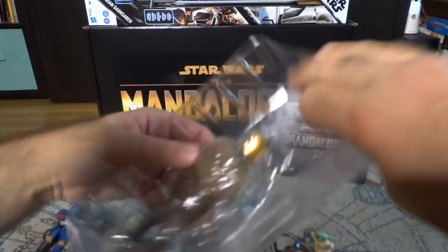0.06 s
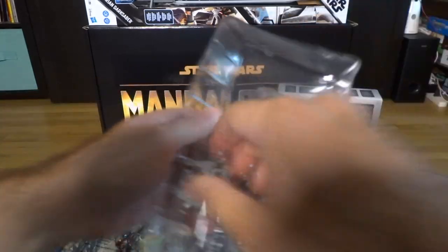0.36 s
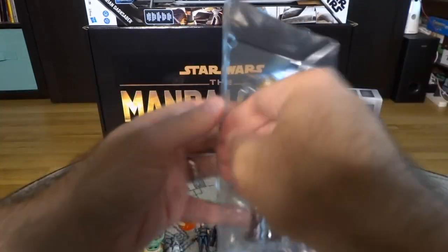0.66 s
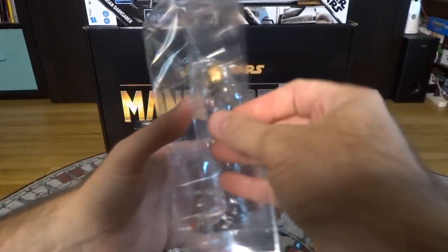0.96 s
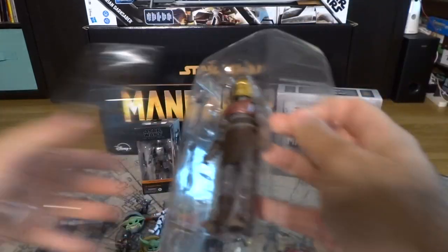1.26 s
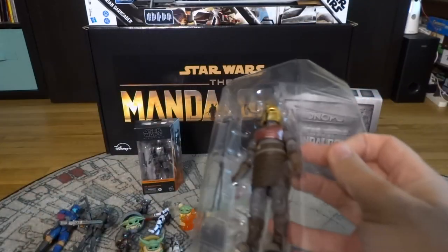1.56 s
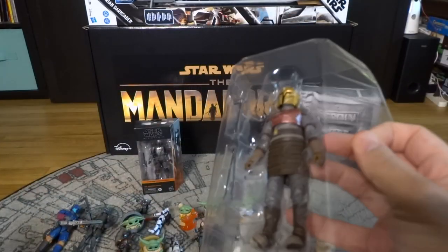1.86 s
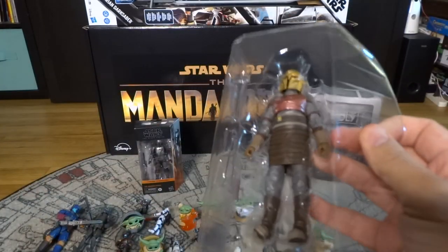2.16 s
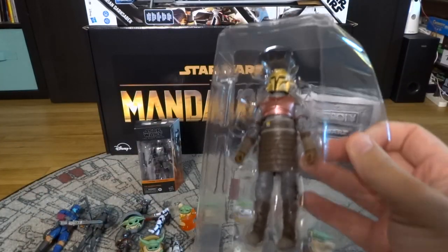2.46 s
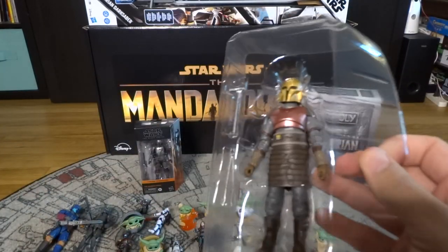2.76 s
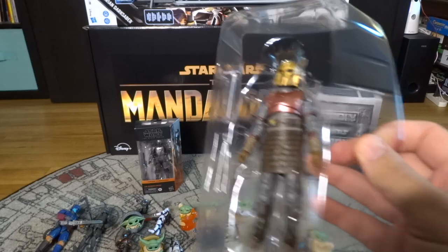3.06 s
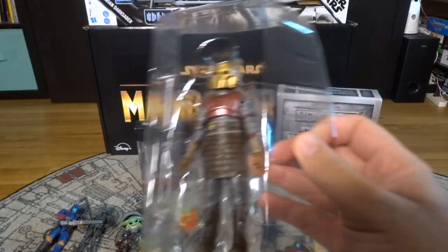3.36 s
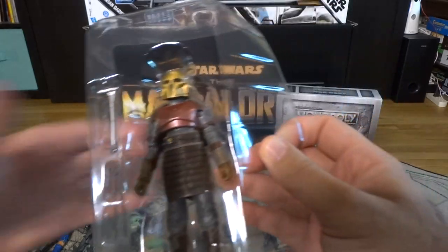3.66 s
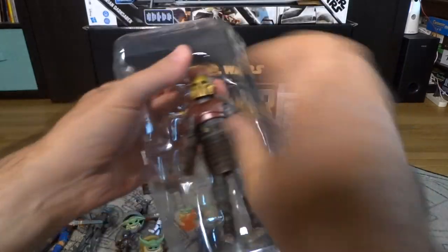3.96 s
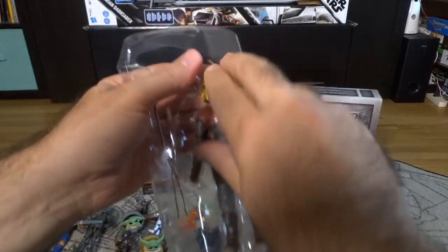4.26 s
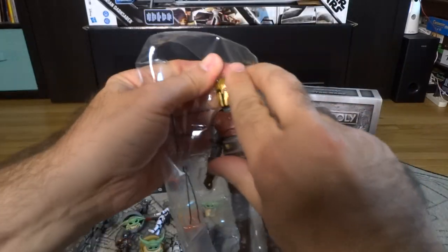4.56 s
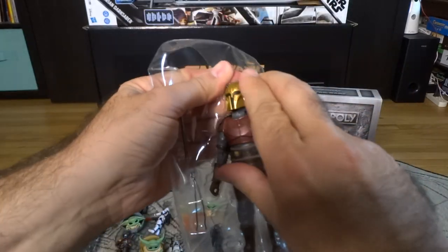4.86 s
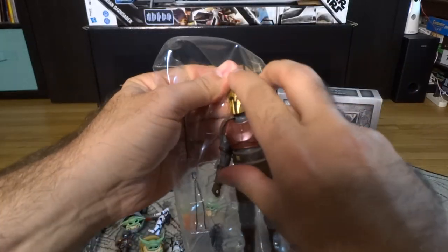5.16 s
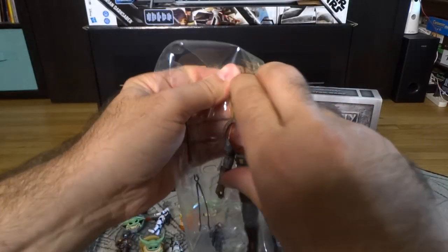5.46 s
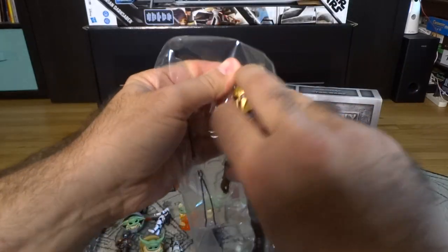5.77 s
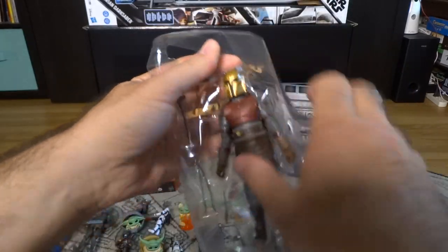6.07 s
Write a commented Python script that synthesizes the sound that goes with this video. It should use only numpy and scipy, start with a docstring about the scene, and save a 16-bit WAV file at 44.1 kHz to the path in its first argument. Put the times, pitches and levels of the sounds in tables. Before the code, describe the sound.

A thin plastic tray holding a toy figure is handled close to the microphone in a quiet living room with slight reverberation. From the start to about 1.5 seconds it crinkles and rubs in short uneven bursts, with bright ticks and hollow pops. A fuller flex with fingertips sliding over the plastic comes at about 1.8 to 2.3 seconds. The handling then drops to faint rustling and a few small ticks. At about 3.8 seconds a strong push starts a dense run of sharp crackles, snapping creases and hollow knocks. Around 4.5 seconds the figure drags against the plastic with a rasp and one very brief high squeal. The crackling eases near 5 seconds, then picks up again from 5.2 seconds, with more pops, finger rubs and clusters of snaps continuing until just past 6 seconds.

```python
"""Unboxing a toy figure

Hands work a figure and its thin plastic tray out of a box, close to the microphone in a living room.
Each push makes the tray flex, rub and crinkle in dense small slips that swell, hold and die away;
between pushes it rustles faintly in the grip. Creases snap with bright ticks, panels pop with hollow
knocks and fingertips slide over them. Once the figure squeals against the plastic that holds it."""
import sys
import numpy as np
from scipy import signal
from scipy.fft import rfft, irfft, next_fast_len
from scipy.io import wavfile
from scipy.ndimage import uniform_filter1d

SR = 44100
rng = np.random.default_rng(int(sys.argv[2]) if len(sys.argv) > 2 else 0)


def wav_out(sig):
    """Save sig, one row per channel (or a flat mono array), as 16-bit PCM at SR to the path in sys.argv[1]."""
    wavfile.write(sys.argv[1], SR, np.round(np.clip(np.atleast_2d(sig).T, -1, 1) * 32767).astype(np.int16))


N = 274743
TIME = np.arange(N) / SR

# pushes of the hands: (start [s], rise [s], length [s], flex [dB], rub [dB], crinkle [dB])
HAND_PUSHES = [(0.0, .025, 0.033, -40.5, -36, -43.5), (0.043, 0.0057, .008, -33.5, -34, -54),
               (0.169, 0.015, 0.011, -29.5, -28.5, -30), (0.434, 0.0022, 0.0072, -44, -29.5, -33.5),
               (0.478, 0.019, 0.032, -42.5, -35, -33.5), (0.604, 0.0055, 0.0099, -53, -51, -41),
               (0.708, 0.007, 0.12, -74, -63, -44.5), (0.822, .075, 0.2, -41.5, -34.5, -35),
               (1.098, 0.008, 0.059, -38.5, -44.5, -39.5), (1.216, 0.03, 0.025, -36.5, -39, -41.5),
               (1.406, 0.0043, 0.0053, -41.5, -55, -42.5), (1.447, .004, 0.0067, -43.5, -46, -73),
               (1.712, .025, .07, -50, -68, -79), (1.832, 0.039, 0.15, -27.5, -27.5, -32),
               (2.118, .003, 0.055, -34.5, -29, -32.5), (2.198, 0.025, 0.031, -32.5, -27, -33.5),
               (2.285, 0.0083, 0.019, -36, -38, -70), (2.616, 0.012, 0.019, -56, -60, -52.5),
               (2.735, 0.025, 0.22, -64, -65, -50), (2.913, 0.02, 0.054, -58.5, -46, -37),
               (3.104, 0.0034, 0.0072, -51, -51, -51.5), (3.332, .006, 0.068, -57.5, -51.5, -47.5),
               (3.743, 0.0044, 0.032, -53.5, -39, -52), (3.82, 0.016, 0.076, -41, -35, -34),
               (3.868, 0.038, 0.052, -27.5, -24.5, -35), (3.991, .01, .03, -47.5, -45.5, -43),
               (4.041, 0.0036, 0.047, -39.5, -27, -30.5), (4.264, 0.024, 0.12, -53.5, -36, -31.5),
               (4.457, 0.015, 0.077, -58, -31.5, -23.5), (4.658, 0.014, 0.0067, -39.5, -31.5, -30),
               (4.742, 0.0039, 0.089, -50.5, -38, -46), (4.964, 0.017, 0.014, -50.5, -39, -38.5),
               (5.062, 0.0091, 0.017, -51.5, -44, -46.5), (5.108, 0.0033, 0.012, -59, -41.5, -39),
               (5.227, 0.0084, .09, -52.5, -36.5, -32), (5.326, .01, 0.075, -50.5, -35.5, -38.5),
               (5.48, 0.0098, 0.054, -46.5, -45.5, -71), (5.59, 0.021, 0.066, -49.5, -42.5, -40),
               (5.734, .012, 0.072, -38.5, -37.5, -34), (5.833, 0.016, 0.036, -40, -35.5, -32),
               (5.998, 0.0033, 0.072, -55.5, -39.5, -41), (6.145, 0.0046, 0.051, -46.5, -40.5, -38)]
# faint rustle of the tray in the grip: (time [s], level [dB])
GRIP_RUSTLE = [(0.0, -40), (0.32, -40.5), (0.42, -53.5), (0.6, -51.5), (1.15, -43.5), (1.37, -69),
               (1.66, -65.5), (1.81, -82), (2.0, -41.5), (2.3, -50.5), (2.7, -63), (3.05, -65), (3.31, -70),
               (3.5, -60.5), (3.73, -60.5), (4.05, -46), (4.5, -34.5), (4.9, -44.5), (5.19, -53),
               (5.75, -36), (6.13, -57)]
# tone of the low flex, the mid rub and the bright crinkle: (frequency [Hz], relative level [dB])
FLEX_TONE = [(30, -51), (70, -8), (130, -9), (220, -3), (330, -1), (560, -2), (700, -4), (1000, -22.5)]
RUB_TONE = [(400, -19), (600, -5.5), (800, 2), (1300, 3), (2000, 1), (2900, -7.5), (3600, -10.5),
            (5000, -13)]
CRINKLE_TONE = [(1800, -48), (2800, 1.5), (3500, 0.5), (5000, -1.5), (6500, 2), (8200, 3.5), (9600, -2),
                (11200, -11.5)]
# creases snapping: (time [s], attack level [dB], pitch [Hz])
CREASE_SNAPS = [(0.0284, -31, 7400), (0.1867, -20, 8060), (0.4367, -28, 5800), (0.44, -21, 7250),
                (0.4943, -25, 8250), (0.5155, -21.5, 6120), (0.7001, -24, 4580), (0.7105, -31.5, 5400),
                (0.9462, -29.5, 6600), (0.991, -29, 3020), (1.4095, -23.5, 8200), (1.4108, -23.5, 8000),
                (1.42, -29, 8300), (2.127, -27.5, 6440), (2.1745, -30.5, 4570), (2.223, -24, 5240),
                (2.7695, -37, 6200), (2.9296, -31, 3700), (3.1095, -41.5, 6560), (3.8797, -22, 4250),
                (3.9005, -21.5, 7600), (3.9184, -24, 3400), (3.9492, -27.5, 5560), (3.997, -27, 7550),
                (4.0026, -20.5, 8500), (4.0177, -19, 8900), (4.0424, -20, 8700), (4.0676, -21.5, 8600),
                (4.1233, -22.5, 9300), (4.1326, -21, 8850), (4.1382, -21.5, 7900), (4.156, -19, 6900),
                (4.1683, -21.5, 7500), (4.1722, -25, 6400), (4.2157, -22, 9100), (4.2334, -20.5, 6900),
                (4.2375, -19.5, 9150), (4.275, -18.5, 9600), (4.2781, -22, 8700), (4.3078, -28, 7100),
                (4.3174, -15.5, 5800), (4.3378, -19, 8350), (4.3447, -22, 8700), (4.352, -19, 9200),
                (4.389, -23.5, 9650), (4.451, -21, 8300), (4.463, -16, 8300), (4.5036, -15, 5130),
                (4.5378, -18.5, 5600), (4.6428, -17.5, 6340), (4.6706, -19, 6160), (4.6764, -22, 7650),
                (4.7703, -25.5, 9800), (4.807, -29.5, 7500), (4.842, -34, 6140), (4.9605, -31.5, 8500),
                (5.1168, -27, 7400), (5.1807, -27, 8500), (5.2365, -18, 7800), (5.244, -34, 9300),
                (5.27, -16.5, 7500), (5.2909, -19, 9000), (5.6802, -26, 6760), (5.706, -28, 8700),
                (5.7393, -27, 8440), (5.7538, -24, 8200), (5.772, -28, 7400), (5.8613, -20.5, 8600),
                (5.872, -17.5, 7960), (5.9004, -16.5, 8650), (5.9154, -17.5, 7540), (5.9267, -17.5, 9000),
                (5.937, -18.5, 8350), (5.9508, -22, 7700), (6.014, -31.5, 3700), (6.1491, -32, 5060),
                (6.1737, -30, 4060), (6.1795, -26.5, 8340), (6.211, -25, 7250), (6.2213, -22.5, 8100)]
# panels popping, some damped by fingers: (time [s], attack level [dB], pitch [Hz], t60 [s])
PANEL_POPS = [(0.0512, -25.5, 1140, 0.089), (0.1505, -39.5, 1730, 0.025), (0.1882, -20.5, 1390, 0.03),
              (0.4396, -24, 1390, 0.023), (0.6836, -35, 2150, 0.013), (0.9837, -32, 840, 0.058),
              (1.1112, -30.5, 2500, .019), (1.285, -38.5, 744, 0.047), (1.41, -44.5, 760, 0.018),
              (1.8653, -34, 1200, .032), (1.9765, -30.5, 800, .013), (2.1168, -32.5, 1800, 0.02),
              (2.2307, -25, 1890, 0.053), (2.2975, -35.5, 1610, 0.026), (3.8782, -29, 1970, .045),
              (3.9246, -22.5, 970, 0.043), (3.9957, -34, 745, 0.015), (4.0435, -26, 2170, .017),
              (4.1716, -31, 2500, 0.018), (4.2153, -32.5, 1730, 0.013), (4.2424, -27.5, 1550, 0.0044),
              (4.3078, -26, 2120, 0.027), (4.4109, -32.5, 2120, 0.014), (4.4623, -27.5, 2200, 0.011),
              (4.501, -31, 2120, .008), (4.5548, -21.5, 1760, 0.009), (4.6432, -27.5, 1790, 0.043),
              (4.6795, -25, 1750, 0.019), (4.7533, -24, 1570, 0.019), (4.8672, -38.5, 1480, 0.019),
              (4.9125, -38, 1880, 0.053), (5.03, -41, 1480, 0.052), (5.0845, -43, 1600, .014),
              (5.1108, -35, 1900, .029), (5.2278, -24.5, 1680, 0.011), (5.2931, -31.5, 1730, 0.031),
              (5.3255, -27, 1210, 0.01), (5.3706, -35.5, 1470, 0.03), (5.4857, -34, 2200, 0.012),
              (5.5324, -24.5, 1105, .038), (5.5603, -33, 1170, .016), (5.6332, -37, 1880, 0.015),
              (5.6625, -32.5, 1690, 0.0074), (5.6828, -33, 1870, .009), (5.7062, -33, 1530, 0.02),
              (5.7576, -31.5, 1690, .018), (5.8004, -30.5, 1000, .009), (5.8178, -35.5, 1770, .023),
              (5.8468, -21.5, 1110, 0.013), (5.8563, -28, 1030, 0.042), (5.9214, -29, 1670, 0.015),
              (5.9499, -35, 1970, .023), (6.0142, -29, 1760, 0.024), (6.1503, -32, 1530, 0.057),
              (6.1929, -29.5, 1870, 0.0023), (6.212, -33.5, 1690, 0.011)]
# fingers sliding over a panel: (time [s], level [dB], pitch [Hz], t60 [s])
FINGER_STROKES = [(0.051, -31.5, 221, 0.06), (0.185, -30, 187, 0.11), (0.62, -36.5, 870, 0.047),
                  (0.794, -33, 2860, 0.03), (0.94, -31.5, 800, 0.18), (0.983, -34.5, 776, 0.31),
                  (1.104, -28.5, 746, 0.055), (1.13, -33, 865, 0.27), (1.866, -26.5, 1210, 0.78),
                  (1.97, -20.5, 244, 0.068), (2.118, -35, 3570, 0.54), (2.223, -34, 125, 0.12),
                  (2.615, -44, 223, 0.14), (2.625, -49, 2600, 0.27), (2.93, -42, 3500, 0.14),
                  (2.93, -39.5, 673, 0.073), (3.335, -51, 447, 0.22), (3.835, -43, 151, 0.3),
                  (4.043, -29, 2660, 0.4), (4.05, -29.5, 8540, 0.42), (5.225, -23.5, 1680, 0.2),
                  (5.323, -26, 890, 0.069), (5.533, -22.5, 750, 0.055)]
# the figure dragged through its pocket: (time [s], rasp [dB], squeal [dB])
FIGURE_DRAG = [(4.46, -38, -62), (4.498, -23, -50), (4.513, -24, -17.5), (4.548, -23, -28),
               (4.558, -27.5, -50), (4.585, -22.5, -47), (4.635, -31.5, -53), (4.68, -49, -73)]
# resonances of that pocket and of the whole tray: (pitch [Hz], nominal width [Hz], relative level [dB])
POCKET_MODES = [(1730, 340, 7), (2720, 330, 3.5), (3530, 1200, 1.5), (4800, 590, -7)]
TRAY_MODES = [(290, 72, -15), (479, 81, 0.5), (780, 16, -10.5), (903, 86, -3.5), (1054, 23, -13),
              (1440, 20, -29), (1690, 77, -21), (1970, 20, -36), (2770, 230, -16.5), (8300, 1900, -15)]
# decay of the living room: (frequency [Hz], t60 [s])
ROOM_DECAY = [(150, 0.39), (400, 0.71), (1000, 0.21), (2800, 0.43), (7300, 0.28), (12000, 0.32)]
# room tone of still air: (frequency [Hz], relative level [dB])
AIR_TONE = [(15, -2), (45, -6.5), (90, -1.5), (170, -20.5), (450, -21), (1200, -29), (4000, -38.5),
            (11000, -37)]
# lead of the left microphone port over the right: (frequency [Hz], phase [rad])
LEFT_LEAD = [(60, .02), (250, 0.16), (500, 0.26), (800, .5), (1300, 0.43), (2200, 0.27), (5000, .1),
             (11000, 0.3)]
# lift of the left port over the right: (frequency [Hz], gain [dB])
LEFT_LIFT = [(60, 0.5), (350, 1), (700, 1.5), (1150, 2), (2100, 0.9), (4000, 1), (11000, 1)]


def effort(push_levels_db, release_db_per_s, grip_db):
    """Envelope in dB of one kind of slip: each push swells, eases and lets go, over the grip's rustle."""
    sag_db_per_s = 47
    power = from_db(in_time(GRIP_RUSTLE)[0] + grip_db) ** 2
    for (start, rise, length, *_), level_db in zip(HAND_PUSHES, push_levels_db):
        first = int(start * SR)
        t = TIME[:min(SR, N - first)]
        fall_db = sag_db_per_s * t + release_db_per_s * np.maximum(t - length, 0)
        power[first:first + len(t)] += (np.minimum(t / rise, 1) * from_db(level_db - fall_db)) ** 2
    return 10 * np.log10(power)


def rustle(level_db, tone, band_hz, per_s, spread_db, cycles, grain):
    """Separate slips stand out while the hands push; a light touch or a fade blurs them into a wash."""
    slope_db_per_s = np.gradient(uniform_filter1d(level_db, size=900)) * SR
    pressing = np.clip((level_db + 73.5) / 22, .15, 1)
    grain_share = np.clip(grain * pressing * (1 + np.minimum(slope_db_per_s, 0) / 130), .1, .97)
    grains = coloured(patches(slips(per_s, spread_db), band_hz, cycles), tone)
    wash = coloured(rng.standard_normal(N), tone)
    return from_db(level_db) * (np.sqrt(grain_share) * grains + np.sqrt(1 - grain_share) * wash)


def slips(per_s, spread_db):
    """Plastic sticks and slips: clicks of uneven size at random moments, levelled over 25 ms."""
    sizes = from_db(spread_db * np.minimum(rng.exponential(1, N), 4)) * rng.choice([-1, 1], N)
    clicks = sizes * (rng.random(N) < per_s / SR)
    local_power = np.abs(uniform_filter1d(clicks ** 2, size=1100))
    return clicks / np.sqrt(local_power + 1e-6)


def patches(clicks, band_hz, cycles, count=18):
    """Every slip rings one patch of plastic, at that patch's own pitch, for a few cycles."""
    patch = rng.integers(0, count, N)
    pitches = np.geomspace(*band_hz, count)
    return sum(resonance(clicks * (patch == k) + 1e-18, hz, hz / cycles) for k, hz in enumerate(pitches))


def buckles(events, attack_s, width, scatter, crumple_s, settle_db, settle_t60, ring_db, band_hz):
    """Plastic gives way in one jump and a dying flurry that ring the patch around it, then settles."""
    t = TIME[:4096]
    out = np.zeros(N + len(t))
    settling = from_db(settle_db) * decay(t, settle_t60)
    for (s, level_db, hz, t60), flurry in zip(events, rng.standard_normal((len(events), len(t)))):
        force = scatter * np.sqrt(hz / SR) * flurry * (decay(t, t60) + settling)
        force[0] = 1 / (1 + t60 / crumple_s)   # a long crumple starts with a smaller jump
        crack = resonance(force, hz, width * hz)
        ring = resonance(crack, hz, np.log(1000) / (np.pi * t60))
        hit = band_pass(crack + from_db(ring_db) * ring, band_hz)
        start = int(s * SR)
        out[start:start + len(t)] += from_db(level_db) * hit / hit[:int(attack_s * SR)].std()
    return out[:N]


def crease_snaps(ring_cycles):
    """Creases snap over with short bright ticks; the higher the pitch, the shorter the ring."""
    creases = [(s, level_db, hz, ring_cycles / hz) for s, level_db, hz in CREASE_SNAPS]
    return buckles(creases, attack_s=.002, width=.38, scatter=1.4, crumple_s=.004,
                   settle_db=-19.5, settle_t60=.042, ring_db=-3.5, band_hz=(3400, 10950))


def panel_pops():
    """Panels pop through with hollow knocks."""
    return buckles(PANEL_POPS, attack_s=.007, width=.81, scatter=.55, crumple_s=.093,
                   settle_db=-26.5, settle_t60=.06, ring_db=-5.5, band_hz=(428, 3350))


def finger_strokes(rise_s, width, per_s):
    """A fingertip catches, then slides to rest in fine slips that ring the panel under it."""
    out, force = np.zeros(N), slips(per_s, spread_db=3)
    for s, level_db, hz, t60 in FINGER_STROKES:
        span = slice(int(s * SR), int((s + t60) * SR))
        t = TIME[span] - TIME[span][0]
        panel = rms_one(double_resonance(force[span], hz, width * hz))
        out[span] += from_db(level_db) * panel * (1 - np.exp(-t / rise_s)) * decay(t, t60)
    return out


def figure_drag(squeal_hz, squeal_width_hz):
    """Quick stick and slip rasps in the pocket that holds the figure and briefly locks into a squeal."""
    rasp_db, squeal_db = in_time(FIGURE_DRAG)
    force = patches(slips(per_s=2200, spread_db=.5), band_hz=(1280, 6000), cycles=4.7)
    rasp = sum(from_db(db) * double_resonance(force, hz, 2 * width) for hz, width, db in POCKET_MODES)
    squeal = double_resonance(slips(per_s=2500, spread_db=0), squeal_hz, squeal_width_hz)
    dragging = (TIME > FIGURE_DRAG[0][0]) * (TIME < FIGURE_DRAG[-1][0])
    return (from_db(rasp_db) * rms_one(rasp) + from_db(squeal_db) * rms_one(squeal)) * dragging


def tray(x, ring_db):
    """Whatever happens to the plastic also rings the whole shell."""
    shell = sum(from_db(db + ring_db) * resonance(x + 1e-18, hz, width) for hz, width, db in TRAY_MODES)
    return x + shell


def room(x, predelay_s):
    """The living room answers with a diffuse tail that dies band by band."""
    t = TIME[:SR * 6 // 10]
    edges, tail = np.geomspace(100, 13000, 8), 0
    for low, high in zip(edges, edges[1:]):
        band = band_pass(rng.standard_normal(len(t)), (low, high))
        tail = tail + band * decay(t, at_hz(ROOM_DECAY, np.sqrt(low * high)))
    tail = tail * (t > predelay_s)
    return signal.fftconvolve(x, tail / np.sqrt(np.sum(tail ** 2)))[:N]


def room_air():
    """Still air: a low, soft bed of noise, mostly common to both channels."""
    return coloured(rng.standard_normal(N) + .54 * rng.standard_normal((2, N)), AIR_TONE)


def microphones(x):
    """Two close ports; the sound reaches the left one a little earlier and louder."""
    size = 2 * next_fast_len(N // 2 + 1024)
    hz = np.arange(size // 2 + 1) * SR / size
    side = np.array([[.5], [-.5]])
    ports = from_db(side * at_hz(LEFT_LIFT, hz)) * np.exp(1j * side * at_hz(LEFT_LEAD, hz))
    return irfft(rfft(x, size) * ports, size)[:, :N]


def coloured(x, tone):
    """Minimum-phase EQ to a tone curve, rolling off past its ends; rms 1."""
    size = 2 * next_fast_len(N // 2 + 4096)
    hz = np.arange(size // 2 + 1) * SR / size
    octaves_above = np.maximum(np.log2((hz + 1) / tone[-1][0]), 0)
    octaves_below = np.maximum(np.log2(tone[0][0] / (hz + 1)), 0)
    gain_db = at_hz(tone, hz) - 20 * np.minimum(octaves_above + octaves_below, 2)
    cepstrum = irfft(np.log(from_db(gain_db)))
    response = np.exp(2 * rfft(cepstrum[:size // 2], size))
    return rms_one(irfft(rfft(x, size) * response)[..., :N])


def resonance(x, hz, width_hz):
    """Two-pole resonance with gain 1 at its peak."""
    r = np.exp(-np.pi * width_hz / SR)
    feedback = [1, -2 * r * np.cos(2 * np.pi * hz / SR), r * r]
    return signal.lfilter(np.array([1, 0, -1]) * (1 - r * r) / 2, feedback, x)


def double_resonance(x, hz, width_hz):
    """The same resonance twice, for steeper skirts."""
    return resonance(resonance(x, hz, width_hz), hz, width_hz)


def band_pass(x, band_hz):
    return signal.sosfilt(signal.butter(2, band_hz, "band", fs=SR, output="sos"), x)


def decay(t, t60):
    return np.exp(-np.log(1000) * t / t60)


def from_db(db):
    return 10 ** (np.asarray(db) / 20)


def rms_one(x):
    return x / np.sqrt(np.mean(x ** 2) + 1e-20)


def in_time(rows):
    """Each column of an automation curve, at every sample."""
    times, *columns = np.transpose(rows)
    return [np.interp(TIME, times, column) for column in columns]


def at_hz(points, hz):
    """A curve read on a log-frequency axis."""
    known_hz, values = np.transpose(points)
    return np.interp(np.log(hz + 1e-3), np.log(known_hz), values)


def scene():
    """The tray's slips, snaps and pops, heard in the room through two close ports."""
    *_, flex_pushes, rub_pushes, crinkle_pushes = np.transpose(HAND_PUSHES)
    flex = rustle(effort(flex_pushes, release_db_per_s=169, grip_db=-12), FLEX_TONE,
                  band_hz=(100.3, 800), per_s=260, spread_db=8.5, cycles=13.7, grain=1)
    rub = rustle(effort(rub_pushes, release_db_per_s=208, grip_db=-6), RUB_TONE,
                 band_hz=(582, 3500), per_s=650, spread_db=5.5, cycles=8.6, grain=.61)
    crinkle = rustle(effort(crinkle_pushes, release_db_per_s=163, grip_db=-4.5), CRINKLE_TONE,
                     band_hz=(2600, 11130), per_s=1900, spread_db=6.5, cycles=12, grain=.76)
    snaps = crease_snaps(ring_cycles=40)
    pops = panel_pops()
    fingers = finger_strokes(rise_s=.00066, width=.29, per_s=1200)
    figure = figure_drag(squeal_hz=5040, squeal_width_hz=600)
    plastic = tray(flex + rub + crinkle + snaps + fingers + figure, ring_db=-3.5)
    plastic += tray(pops, ring_db=12)   # a pop shakes the shell harder than a passing slip
    reverb = from_db(-13.5) * room(plastic, predelay_s=.0037)
    # reflections from the side walls reach the two ports unequally
    side_walls = from_db(-18.5) * room(plastic, predelay_s=.001) * np.array([[1], [-1]])
    return microphones(plastic + reverb) + side_walls + from_db(-66.5) * room_air()


def record(dry):
    """A steep high cut takes off the very top."""
    cutoff_hz = 11200
    return signal.sosfilt(signal.ellip(10, .2, 70, cutoff_hz, fs=SR, output="sos"), dry)


dry = scene()
out = record(dry)
wav_out(out)
```